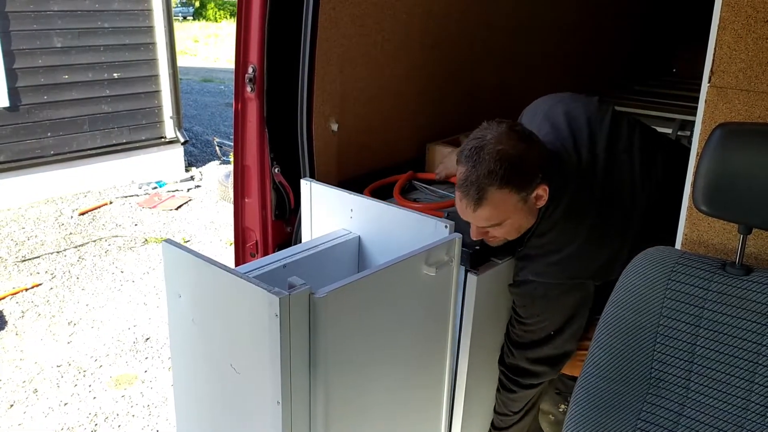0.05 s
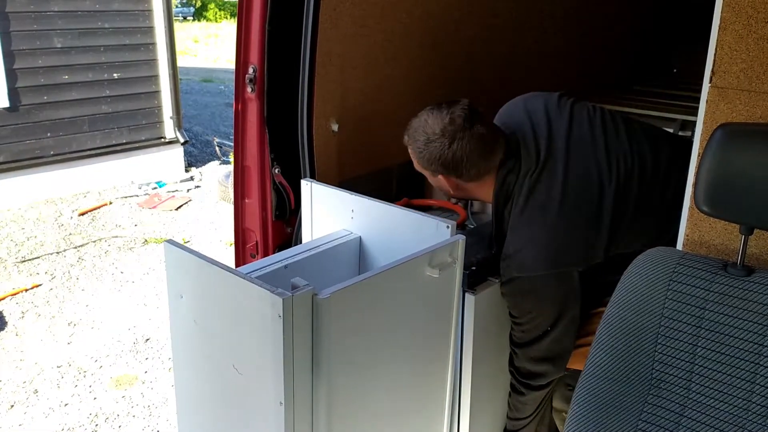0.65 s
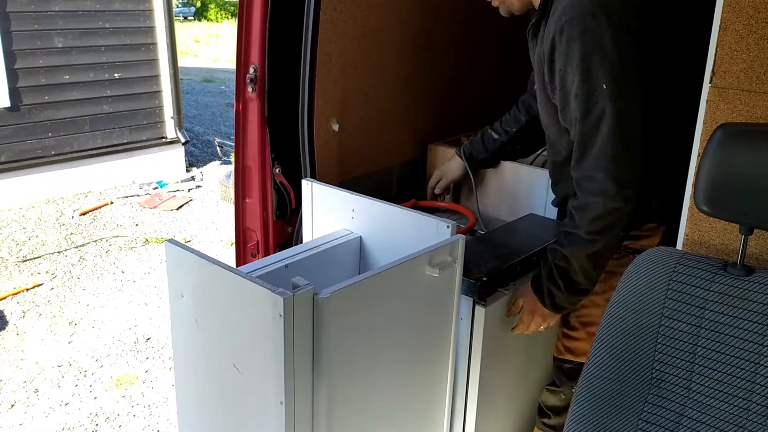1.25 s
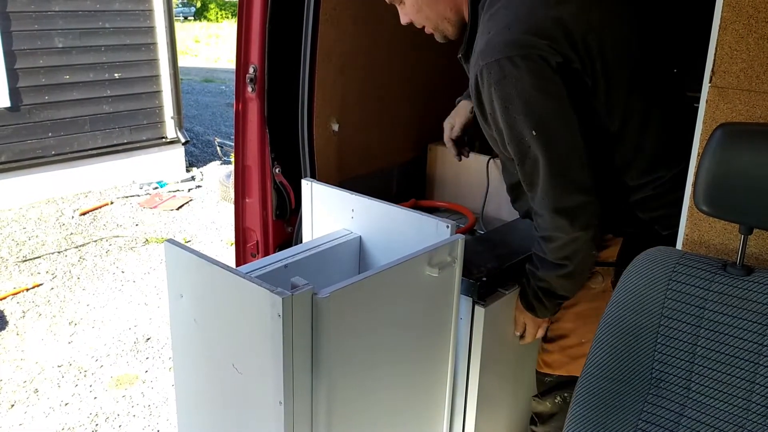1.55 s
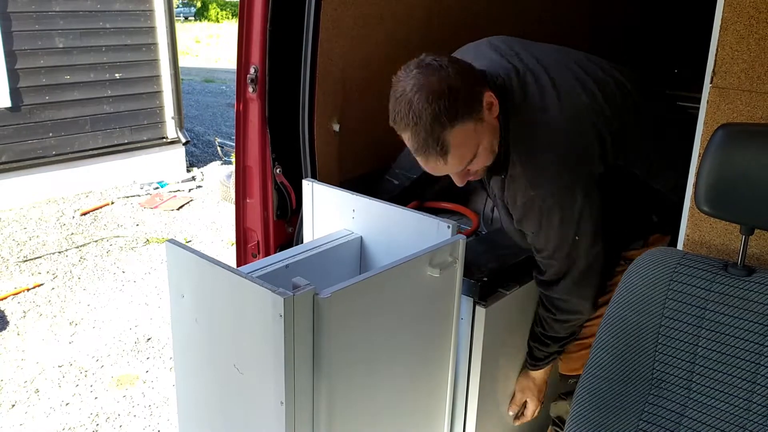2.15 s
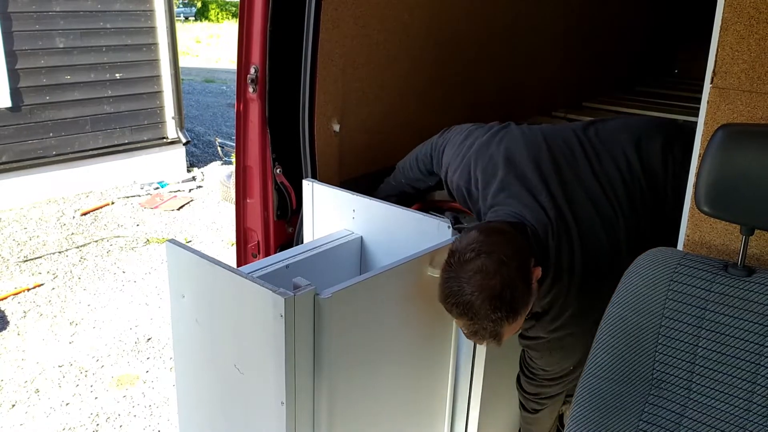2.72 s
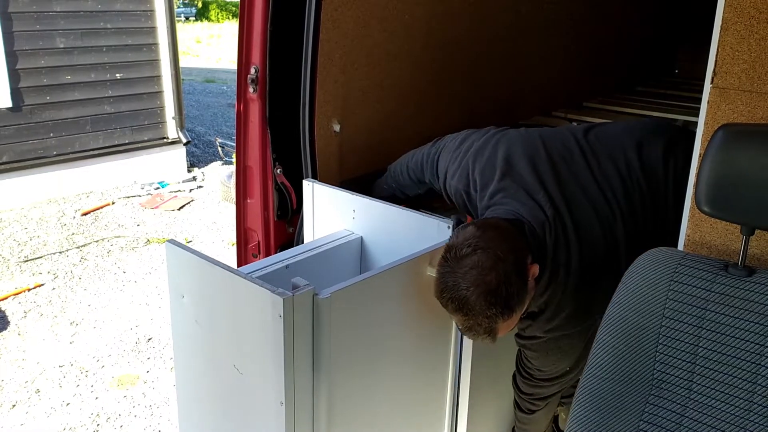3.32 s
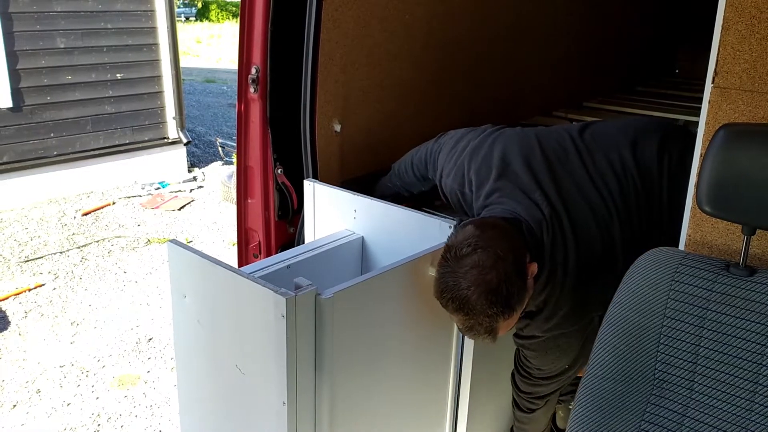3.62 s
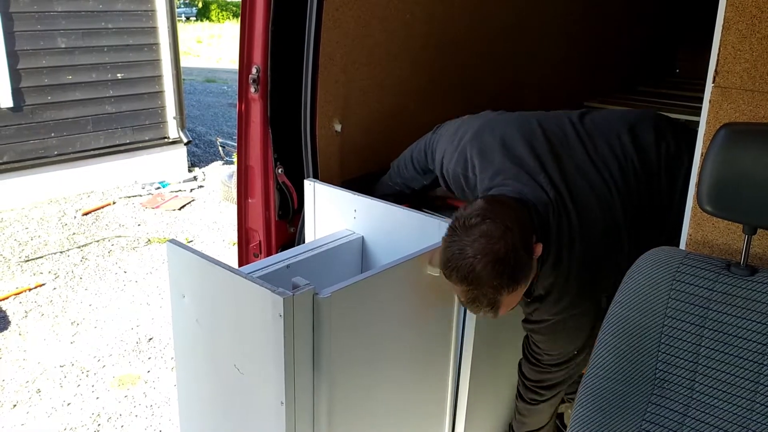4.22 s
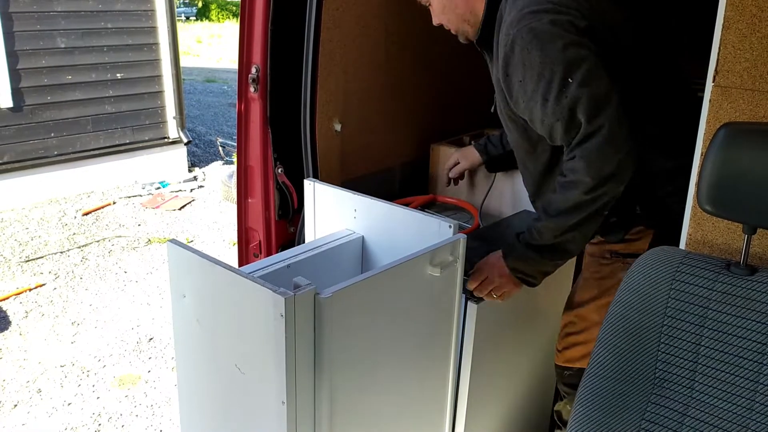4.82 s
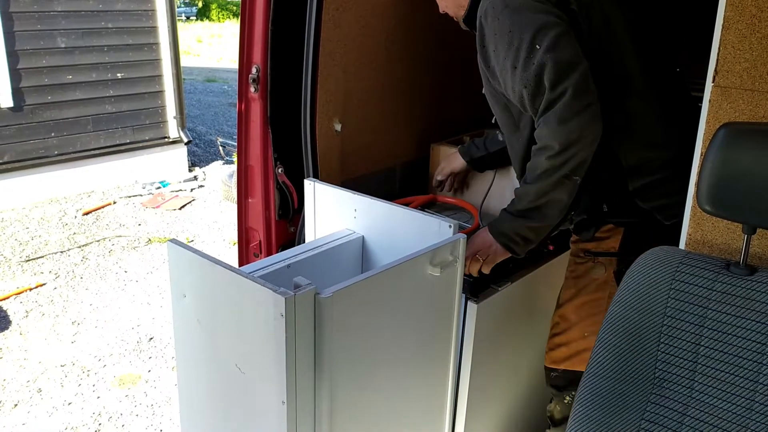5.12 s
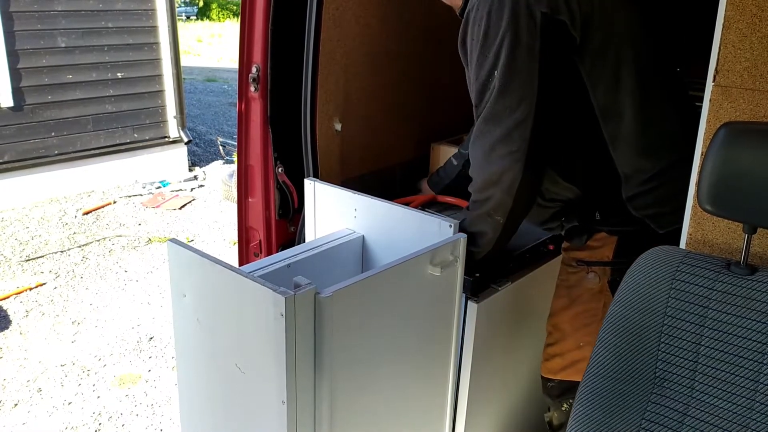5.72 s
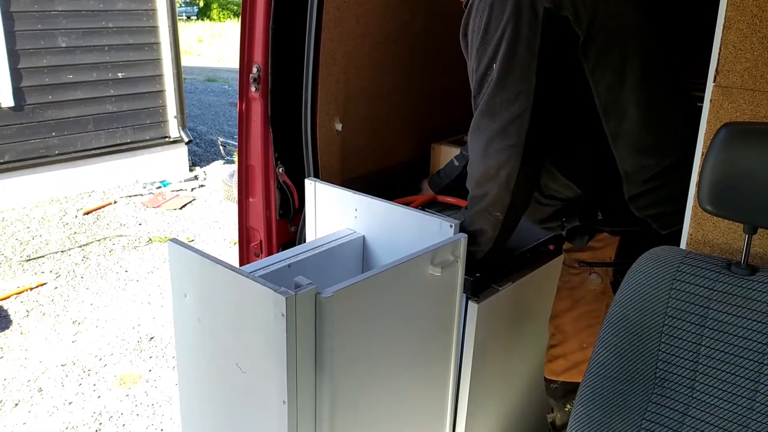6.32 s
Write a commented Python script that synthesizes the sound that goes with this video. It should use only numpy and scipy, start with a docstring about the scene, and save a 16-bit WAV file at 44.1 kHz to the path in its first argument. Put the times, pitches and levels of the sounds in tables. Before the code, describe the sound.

Heard nearby in a van's boxy load space, a fridge casing knocks and scrapes hard against wooden panels, which boom briefly through the floor. Scattered lighter taps and soft rubbing of hands and cloth follow, then a dense series of thuds and sharp cracks as the fridge rocks. After a quieter moment, one last push thumps and ends in a brief squeak, leaving only a faint low rumble.

```python
"""A small fridge is worked into a wooden cabinet inside a van with its side door open.
Its casing cracks and bumps against the panels, which boom and ring on through floor and body;
one bump sets a metal part shivering. Hands and sleeves rub between the shoves, edges stick and slip,
and the last push ends in a short squeak. The floor rumbles under feet and the rocking fridge."""
import sys
import numpy as np
from scipy import signal
from scipy.io import wavfile

SR = 44100
rng = np.random.default_rng(int(sys.argv[2]) if len(sys.argv) > 2 else 0)


def unload_audio(sound):
    """Save the sound as a 16-bit wav file, at the path given as the first command line argument."""
    columns = np.transpose(np.atleast_2d(sound))
    # keep every value between -1 and 1, then stretch to whole-number steps
    steps = np.round(np.clip(columns, -1, 1) * 32767)
    wavfile.write(sys.argv[1], SR, steps.astype(np.int16))


N = 280476
CUTOFF_HZ = 15950

# fridge against cabinet: t/s, thud/dB, boom/dB, clack/dB, crack/dB, fizz/dB, panel note f/Hz, note/dB
# (all levels after the thud are relative to it)
BLOWS = [(0.233, -41.5, -20, -9, -13, -29, 166, -15), (0.249, -32.5, -11, -25, -32, -22.5, 250, -5.5),
         (0.395, -15.5, -49, -4.5, -6, 0, 248, -9), (0.461, -17, -14, -15, -33, -34, 179, -2.5),
         (0.488, -25.5, -5, -15, -32, -13, 159, -3), (0.535, -16.5, -7.5, -17.5, -28, -30, 289, -6.5),
         (0.546, -24, -30, -5.5, -23, -22, 163, 2.5), (0.583, -33.5, -28, -10, -38, -26, 119, -4),
         (0.895, -24, -26, -17.5, -44, -27, 171.3, -7), (0.937, -24.5, -11.5, -19, -47, -37, 146.2, 3),
         (1.031, -33.5, -17, -39, -29, -18.5, 175, -2.5), (1.511, -34.5, -27, 0, -4.5, -24, 372, -3.5),
         (1.852, -38, -12, -16, -41, -26, 174, -6), (2.362, -52, -20, 6.5, 0, -20, 323, -14),
         (2.455, -43.5, -11, -7.5, -27, -15, 147, -5), (2.642, -44, -35, -3, -14, -24, 253, -3.5),
         (2.694, -36, -35, -5.5, -20, -38, 126, -10), (2.843, -29, -27, -15, -30, -22, 161, -4),
         (3.014, -40.5, -36, -10, -14, -30, 174, -11), (3.312, -32, -13, -14, -23, -34, 152.6, -2),
         (3.362, -40.5, -3, -17, -40, -25, 135, -2), (3.41, -46, -24, -4, 3, 2, 166, 3),
         (3.458, -44.5, -18, -4, -8, -1.5, 156, 0), (3.538, -37.5, 5, -18, -25, -13, 180, 4),
         (3.586, -18.5, -22, -9, -21.5, -16.5, 184, -9), (3.609, -23.5, -3.5, -14.5, -15, -30, 340, 0.5),
         (3.633, -28, -24, -16.5, -28, -21, 335, -2), (3.716, -25.5, -36, -2, 4.5, -4.5, 340, -7),
         (3.805, -19.5, -20, -12.5, -19, -19, 331, -1.5), (3.819, -25.5, -17, -18, -11, -6.5, 180, -2),
         (3.926, -41, -4, -11, -46, -26, 110, 2), (4.104, -20, -3.5, -17, -25, -24, 333, -23),
         (4.124, -26, -27, 0.5, -6, -5, 347, 0), (4.151, -31, -26, -3, -12.5, -24, 153, -11),
         (4.232, -19.5, -9.5, -13, -20.5, -25, 155, 1.5), (4.25, -20.5, -35, -10, -25.5, -27, 163, -7),
         (4.594, -37, -40, -10.5, -23, -29, 330, -7.5), (5.406, -36.5, -30, -17, -11, -17, 332, -9.5),
         (5.515, -39.5, -2, -21, -14, -5, 135, 3.5), (5.543, -29.5, -4, -12, -16, -9, 119, 0),
         (5.585, -34.5, -9, -29, -4, 0, 155, 6.5), (5.711, -26, -13, -45, -36, -28, 179.5, -3.5),
         (5.74, -33, -13, -38, -37, -35, 180, -3)]
# long modes of cabinet, floor and van body: f/Hz, level/dB, t60/s
BODY_MODES = [(59.3, -18, 0.72), (78.24, -7.5, 0.68), (85.94, -11.5, 0.8), (144.5, -17.5, 0.75),
              (177.2, -15.5, 0.53), (220.4, -24, 0.41), (328.6, -29, 0.51), (333.5, -25.5, 0.74)]


def panels(level_db=-9.0, tail_db=-29.0, tail_t60_s=0.43):
    """Each blow builds as the faces close, then dies in the dense panel modes and the van's tail."""
    # spectrum common to all blows: f/Hz, band level/dB
    colour = [(30, -52), (55, -3.5), (85, 2), (120, -1), (175, -3), (330, -5), (620, -6.5), (1000, -2.5),
              (1700, -7.5), (2800, -1), (7000, -4.5), (15000, -3.5)]
    # panel decay: f/Hz, t60/s
    decay = [(60, 0.23), (170, 0.13), (500, 0.14), (1500, 0.15), (5000, 0.14), (15000, 0.1)]
    out, t = np.zeros((2, N + SR)), np.arange(SR // 3) / SR
    white = rng.standard_normal((2, 2, N))   # adjacent bands get unrelated noise
    tail = from_db(tail_db) * dying(t, tail_t60_s)
    for k, (hz, sos) in enumerate(bands()):
        gains = from_db(level_db + blow_db(hz) + at_hz(colour, hz))
        t60_s = at_hz(decay, hz)
        mid_side = np.zeros((2, N + SR))
        for (s, *_, build_s, decay_share), gain in zip(contacts(), gains):
            span = slice(round(s * SR), round(s * SR) + len(t))
            closing = np.minimum(t / build_s, 1) ** 2
            force = closing * (dying(t, t60_s * decay_share) + tail)
            burst = signal.sosfilt(sos, force * white[k % 2, :, span])
            energy_ratio = np.sum(force ** 2) / np.sum(burst ** 2, axis=1, keepdims=True)
            mid_side[:, span] += gain * np.sqrt(energy_ratio) * burst
        out += place(*mid_side, hz)
    return out[:, :N]


def panel_notes(t60_s=0.14, slowness=2.0, level_db=1.0):
    """The struck panel swells into its own hollow note, more slowly than the contact."""
    out, t = np.zeros((2, N + SR)), np.arange(SR // 2) / SR
    for s, thud_db, hz, note_db, build_s, decay_share in contacts():
        swell = 1 - np.exp(-t / (slowness * build_s))
        envelope = from_db(level_db + thud_db + note_db) * swell * dying(t, t60_s * decay_share)
        at = round(s * SR)
        out[:, at:at + len(t)] += place(envelope * np.sin(2 * np.pi * hz * t), 0, hz)
    return out[:, :N]


def contacts():
    """Per blow: the sharper the crack, the faster the build-up and the sooner the panel stops."""
    soft_hard_db = [-60.5, -37]
    for s, thud_db, _, _, crack_db, _, hz, note_db in BLOWS:
        build_s = np.interp(thud_db + crack_db, soft_hard_db, [0.0055, 0.0028])
        decay_share = np.interp(thud_db + crack_db, soft_hard_db, [0.99, 0.69])
        yield s, thud_db, hz, note_db, build_s, decay_share


def blow_db(hz, clack_share=0.39, hollow_db=2.0):
    """Level of every blow at one frequency: hard contacts reach high, soft ones fade above the thud."""
    # corners of the blow spectrum: f/Hz
    corners_hz = [70, 140, 420, 800, 1700, 2600, 4800, 8500]
    levels_db = []
    for _, thud, boom, clack, crack, fizz, *_ in BLOWS:
        shape_db = [boom, 0, hollow_db + clack_share * clack, clack, clack, crack, crack, fizz]
        levels_db.append(thud + np.interp(np.log(hz), np.log(corners_hz), shape_db))
    return np.array(levels_db)


def casing():
    """The fridge casing rings briefly at each blow."""
    # casing modes: f/Hz, level/dB, t60/s
    modes = [(419.2, -14.5, 0.17), (533, -15.5, 0.098), (816, -7.5, 0.059), (1202, -9.5, 0.11),
             (1329, -10.5, 0.059), (1800, -21.5, 0.045), (2630, -4, 0.03), (2770, -11, 0.07),
             (3640, -15, 0.086), (4430, -16, 0.099), (6050, -15, 0.088), (7010, -17, 0.091)]
    return struck(modes, level_db=-6.0, spread_db=1.0)


def struck(modes, level_db, spread_db):
    """Every blow excites each mode, with random scatter in strength and direction."""
    out, onsets = np.zeros((2, N)), [round(row[0] * SR) for row in BLOWS]
    for k, (hz, mode_db, t60_s) in enumerate(modes):
        scatter, sideways = rng.standard_normal((len(onsets), 2)).T
        strength = from_db(level_db + mode_db + blow_db(hz) + spread_db * scatter)
        clicks = np.zeros((2, N))
        clicks[:, onsets] = place(strength, strength * np.tanh(sideways), hz)
        out += (-1) ** k * ring(clicks, hz, t60_s)
    return out


def metal(struck_s=0.55):
    """A metal part of the fridge shivers after a hard bump; close modes beat at about 14 Hz."""
    # metal modes: f/Hz, level/dB, t60/s
    modes = [(845, -61, .8), (901, -56, 1.1), (915.3, -54, 2.1), (929.6, -56, 1.8), (1017, -48, .3),
             (1665, -53, .45)]
    click = signal.unit_impulse(N, round(struck_s * SR))
    return sum(place(from_db(db) * ring(click, hz, t60_s), 0, hz) for hz, db, t60_s in modes)


def squeaks(flutter_db=4.0, wet_db=-0.5, van_t60_s=0.15):
    """Edges stick and slip unevenly; pitch climbs as the slide speeds up, and the walls smear it."""
    # squeaks: peak t/s, f/Hz, level/dB, half length/s, rise/share of f, overtone step/dB, jitter/share of f
    slips = [(.972, 1560, -55, 0.0093, .02, 23, 0.06), (1.471, 2725, -60, 0.015, .01, 22, 0.064),
             (1.69, 2810, -76, 0.08, 0.004, 24.5, 0.052), (2.194, 3744, -59.5, 0.045, 0.0031, 26, 0.05),
             (4.574, 910, -67, 0.008, 0.013, 12, 0.08), (4.616, 4570, -73, 0.018, 0.0023, 4, .014),
             (5.445, 400, -54.5, 0.012, 0.019, 18, 0.028), (5.58, 1890, -42.5, 0.015, 0.035, 27, 0.04),
             (5.594, 1975, -44.5, 0.016, .015, 3, 0.055)]
    out, t = np.zeros((2, N + SR)), np.arange(-SR // 6, SR // 6) / SR
    for s, hz, db, half_s, rise, step_db, jitter in slips:
        pitch_hz = hz * (1 + rise * np.tanh(t / half_s) + jitter * drift(900)[:len(t)])
        phase = 2 * np.pi * np.cumsum(pitch_hz) / SR
        envelope = from_db(db + flutter_db * drift(400)[:len(t)]) / np.cosh(t / half_s) ** 2
        tone = sum(from_db(-step_db * k) * np.sin((k + 1) * phase) for k in range(int(CUTOFF_HZ / hz)))
        direct = envelope * tone
        walls = rms_one(rng.standard_normal((2, len(t))) * dying(t - t[0], van_t60_s)) / np.sqrt(len(t))
        wet_mid, wet_side = from_db(wet_db) * signal.fftconvolve(direct[None], walls, axes=1)[:, :len(t)]
        at = round((s + t[0]) * SR)
        out[:, at:at + len(t)] += place(direct + wet_mid, wet_side, hz)
    return out[:, :N]


def singing(squeak, hz=1912, coupling_db=-76, t60_s=1.0):
    """A squeak passes through the pitch of a metal part and leaves it ringing."""
    return squeak + from_db(coupling_db) * ring(squeak, hz, t60_s)


def rubbing(level_db=-5.5, grain_db=1.0, patchy_db=1.5, catches_per_s=20, catch_db=5.0, catch_t60_s=0.05):
    """Friction: fine grain common to all bands, and ticks where an edge catches on the wood."""
    # friction spectrum: f/Hz, band level/dB
    colour = [(400, -10), (600, -4.5), (950, 1), (1700, 0), (2600, -1.5), (4000, -1.5), (8000, -1),
              (15000, -1)]
    rub_db, fizz_db = strokes()
    force = from_db(level_db + rub_db + grain_db * drift(450))
    catches = (rng.random(N) < catches_per_s / SR) * rng.uniform(0.32, 1, N)
    ticks = from_db(catch_db) * signal.lfilter([1], [1, -dying(1 / SR, catch_t60_s)], catches + 1e-18)
    out = np.zeros((2, N))
    for hz, sos in bands():
        if hz > colour[0][0]:
            fizz_share = at_hz([(3500, 0.065), (8000, 0.99)], hz)   # cloth is brighter than a palm
            tick_share = at_hz([(1400, 0.89), (6000, 0.1)], hz)
            gain = force * from_db(at_hz(colour, hz) + fizz_share * fizz_db + patchy_db * drift(35))
            out += gain * np.hypot(1, tick_share * ticks) * band_noise(hz, sos)
    return out


def strokes(still_db=-77.5, still_fizz_db=2):
    """Summed level and relative fizz of the strokes, in dB, over a faint steady hiss."""
    # hands, sleeves and casing over the panels: peak t/s, level/dB, swell/s, fade/s, relative fizz/dB
    moves = [(0.08, -74.5, 0.043, .08, 3), (0.255, -67.5, .05, .06, -2), (0.354, -65.5, .02, .04, -6),
             (0.47, -46.5, 0.056, .2, 1.5), (0.548, -45.5, .06, 0.057, -3), (0.65, -72, .1, .35, -1),
             (0.88, -57.5, 0.12, .2, 1.5), (0.935, -54, 0.016, 0.072, -20), (1.14, -67.5, 0.23, .35, -1),
             (1.28, -70.5, 0.1, .1, 7), (1.485, -58.5, 0.059, .05, 8.5), (1.67, -71.5, 0.24, .5, -1),
             (1.95, -71, 0.22, .25, 1), (2.175, -58, 0.065, .33, 0.5), (2.42, -64, 0.071, .3, -5.5),
             (2.70, -55, 0.029, .06, -16), (2.85, -57, 0.17, .12, 2), (2.97, -62, 0.048, 0.21, 4),
             (3.205, -63, 0.062, .04, -3), (3.3, -63, 0.061, .13, 5), (3.44, -62, .025, .1, 3),
             (3.48, -61.5, 0.089, .07, -1), (3.58, -61.5, 0.099, .06, 6.5), (3.65, -62, 0.087, .05, -6),
             (3.82, -58.5, 0.25, .13, 3), (4.012, -63.5, 0.047, .11, 2), (4.16, -59, 0.13, .25, 3.5),
             (4.43, -71.5, 0.17, .35, 1), (4.932, -66.5, 0.047, .06, -5), (5.0, -74.5, 0.12, .5, 1.5),
             (5.285, -72, .05, .04, 12), (5.565, -49.5, 0.067, .08, -3), (5.712, -51.5, 0.059, .07, -12.5),
             (6.08, -70.5, .02, .05, -7)]
    body, fizz = from_db(still_db) ** 2, from_db(still_db + still_fizz_db) ** 2
    for s, db, swell_s, fade_s, fizz_db in moves:
        power = swell_power(s, db, swell_s, fade_s)
        body += power
        fizz += power * from_db(fizz_db) ** 2
    return level_of(body), level_of(fizz / body)


def rumble(level_db=-5.5, hum_db=-11.5):
    """Shifting weight shakes the floor; the long modes of the van hum along."""
    # floor spectrum: f/Hz, band level/dB
    colour = [(30, -20.5), (55, -15.5), (85, -3), (170, -4.5), (330, -7.5), (500, -13.5), (800, -15.5),
              (1600, -21)]
    out = np.zeros((2, N))
    for hz, sos in bands():
        if hz < colour[-1][0]:
            out += from_db(at_hz(colour, hz)) * band_noise(hz, sos)
    for hz, _, t60_s in BODY_MODES:
        hum = rms_one(ring(rng.standard_normal(N), hz, t60_s))
        out += from_db(hum_db + at_hz(colour, hz)) * place(hum, 0, hz)
    return out * from_db(level_db) * floor_load()


def floor_load(swell_s=0.057, fade_s=0.19):
    """Drive on the floor: shuffling feet, plus a surge whenever the fridge rocks."""
    # fridge rocking onto the floor: t/s, level/dB
    rocks = [(0.52, -33), (1.01, -44.5), (2.89, -58), (3.52, -49.5), (3.76, -41), (4.24, -43),
             (5.52, -49.5), (5.69, -47.5), (6.09, -56), (6.22, -60)]
    # shuffling feet: t/s, level/dB
    shuffle = [(0.0, -65), (0.3, -57.5), (1.2, -57.5), (1.7, -63), (3.2, -56.5), (4.5, -61), (5.0, -63),
               (6.36, -65)]
    rocking_db = level_of(sum(swell_power(s, db, swell_s, fade_s) for s, db in rocks))
    return np.hypot(from_db(in_time(shuffle)), from_db(rocking_db))


def cabin(x):
    """Load space and panels colour the sound with a chain of peaks and dips."""
    # resonances: f/Hz, width/Hz, gain/dB
    resonances = [(81, 6.7, 3), (98, 26, -7), (181.5, 6.3, 3.5), (253, 20, 4), (278, 46, -5.5),
                  (326, 26, 6.5), (433, 12, 3), (517, 13, 7), (586, 74, -7), (842, 6.1, 4.5),
                  (1140, 26, 3.5), (1350, 11, 3.5), (1600, 990, -3), (1915, 15, 4.5), (2513, 70, 3.5),
                  (2800, 23, 2), (3850, 37, -1), (5980, 37, 0), (7200, 64, 4), (8900, 40, 3.5)]
    for hz, width_hz, db in resonances:
        w, half_band, gain = 2 * np.pi * hz / SR, np.pi * width_hz / SR, from_db(db / 2)
        x = signal.lfilter([1 + half_band * gain, -2 * np.cos(w), 1 - half_band * gain],
                           [1 + half_band / gain, -2 * np.cos(w), 1 - half_band / gain], x)
    return x


def place(mid, side, hz):
    """Mid/side to left/right: bass arrives as one, treble is scattered by the walls."""
    # stereo width: f/Hz, side minus mid/dB
    widths = [(60, -19), (125, -16), (250, -14), (500, -6), (1000, -5.5), (2000, 0), (8000, -2),
              (14000, 1.5)]
    # balance: f/Hz, left minus right/dB
    leans = [(60, 1.5), (150, 2), (330, 3.5), (600, 0), (1200, 1.5), (2400, 1), (5000, 0.5), (14000, -1)]
    width, lean = from_db(at_hz(widths, hz)), from_db(at_hz(leans, hz) / 2)
    return np.array([(mid + width * side) * lean, (mid - width * side) / lean])


def swell_power(s, db, swell_s, fade_s, span_db=21.5, roundness=1.27):
    """Power of a movement that is fastest at `s`, every 32nd sample."""
    t = np.arange(0, N, 32) / SR - s
    away = np.minimum(np.maximum(-t / swell_s, t / fade_s), 6)
    return from_db(db - span_db * away ** roundness) ** 2


def level_of(power):
    """Power every 32nd sample to dB at every sample."""
    return np.interp(np.arange(N), np.arange(0, N, 32), 10 * np.log10(power))


def bands():
    """Centre/Hz and band-pass of 15 log-spaced bands."""
    edges_hz = np.geomspace(30, 17500, 16)
    for low, high in zip(edges_hz, edges_hz[1:]):
        yield np.sqrt(low * high), signal.butter(2, [low, high], "band", fs=SR, output="sos")


def band_noise(hz, sos):
    """Stereo noise in one band."""
    return place(*rms_one(signal.sosfilt(sos, rng.standard_normal((2, N)))), hz)


def ring(drive, hz, t60_s):
    """One mode: a unit click gives a decaying unit sine."""
    r, w = from_db(-60 / (t60_s * SR)), 2 * np.pi * hz / SR
    return signal.lfilter([0, np.sin(w)], [1, -2 * r * np.cos(w), r * r], drive + 1e-18)


def dying(t, t60_s):
    """Decay of 60 dB per t60_s."""
    return np.exp(-np.log(1000) * t / t60_s)


def drift(knots_per_s):
    """Random curve through unit-variance knots."""
    knots = rng.standard_normal(4096)
    return np.interp(np.arange(N) / SR * knots_per_s, np.arange(len(knots)), knots)


def at_hz(points, hz):
    """Read a spectrum on a log-frequency axis."""
    freqs_hz, values = np.transpose(points)
    return np.interp(np.log(hz), np.log(freqs_hz), values)


def in_time(points):
    """Read a curve at every sample."""
    return np.interp(np.arange(N) / SR, *np.transpose(points))


def rms_one(x):
    """Scale to unit rms."""
    return x / np.sqrt(np.mean(x ** 2) + 1e-20)


def from_db(db):
    """dB to gain."""
    return 10 ** (np.asarray(db) / 20)


def scene():
    """Blows, their ringing, friction and floor rumble."""
    ringing = struck(BODY_MODES, level_db=-8.0, spread_db=1.6) + casing()
    noises = cabin(panels() + rubbing() + rumble())
    return noises + panel_notes() + ringing + metal() + singing(squeaks())


def record(dry, low_cut_hz=42):
    """The microphone loses the deepest bass, the level dips briefly, and the top is cut."""
    # gain with one dip: t/s, gain/dB
    dip = [(5.455, 4.5), (5.474, -21), (5.485, -19), (5.505, 1)]
    high_pass = signal.butter(2, low_cut_hz, "high", fs=SR, output="sos")
    low_pass = signal.ellip(10, .2, 70, CUTOFF_HZ, fs=SR, output="sos")
    thinned = signal.sosfilt(high_pass, dry)
    return signal.sosfilt(low_pass, thinned * from_db(in_time(dip)))


dry = scene()
out = record(dry)
unload_audio(out)
```